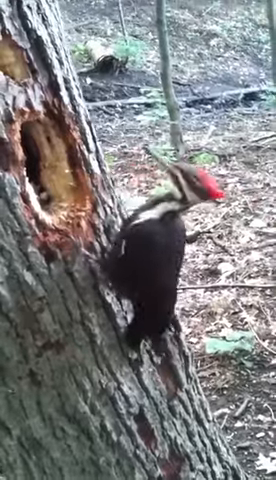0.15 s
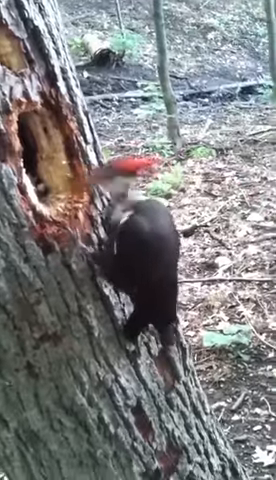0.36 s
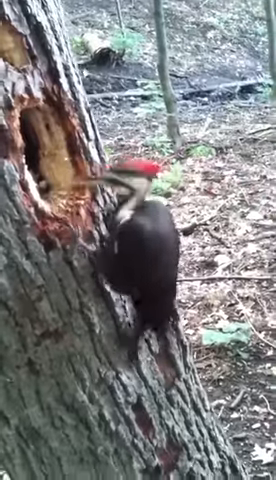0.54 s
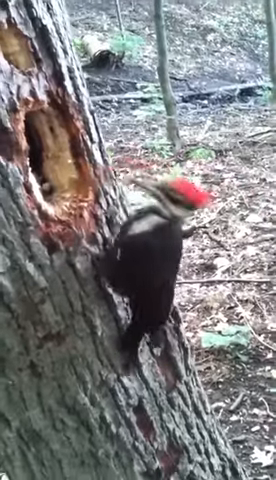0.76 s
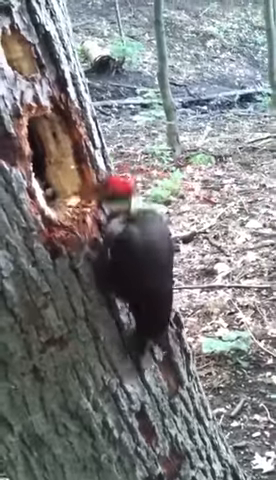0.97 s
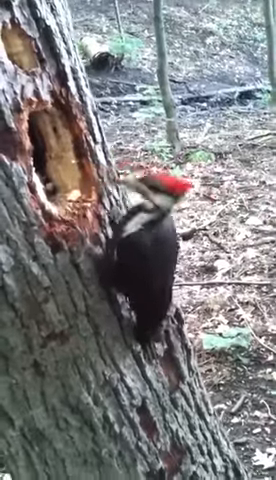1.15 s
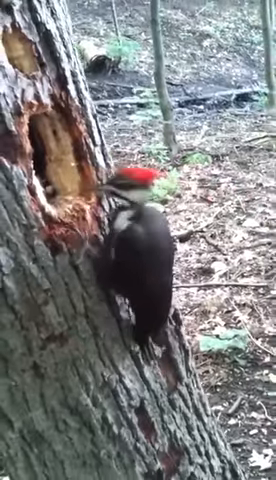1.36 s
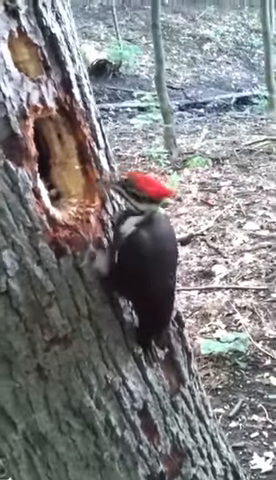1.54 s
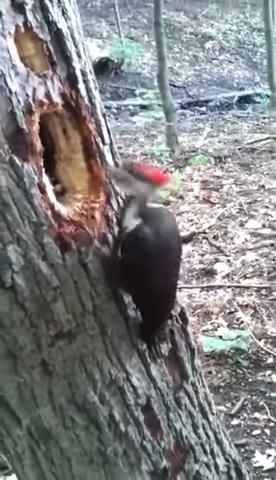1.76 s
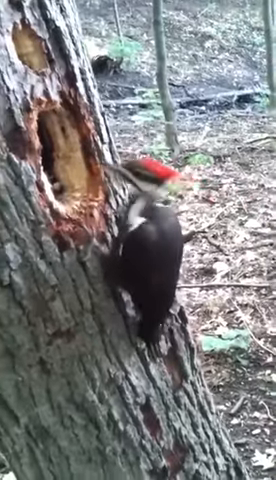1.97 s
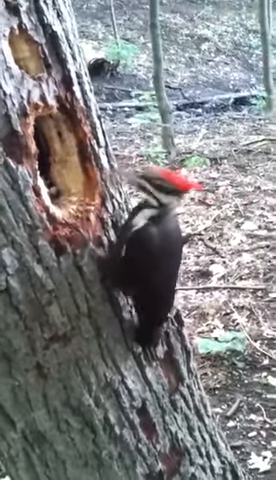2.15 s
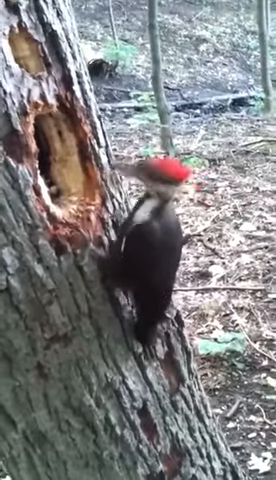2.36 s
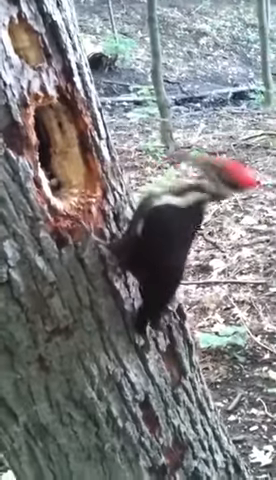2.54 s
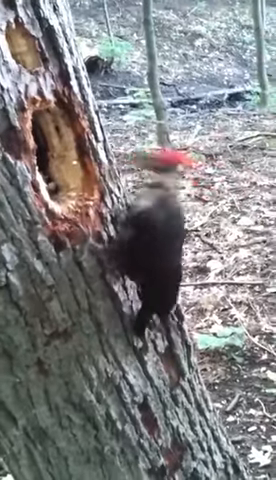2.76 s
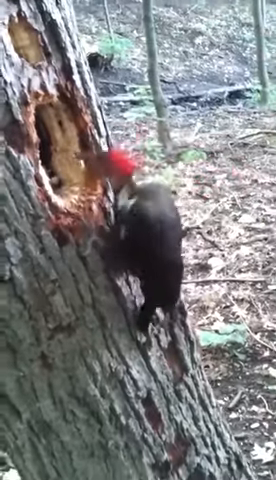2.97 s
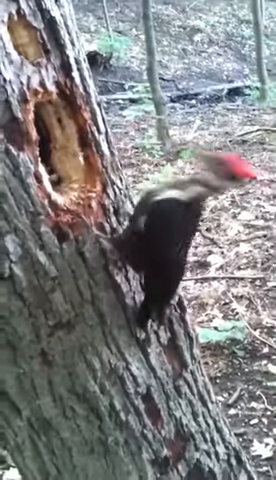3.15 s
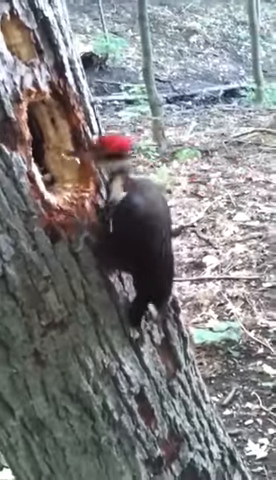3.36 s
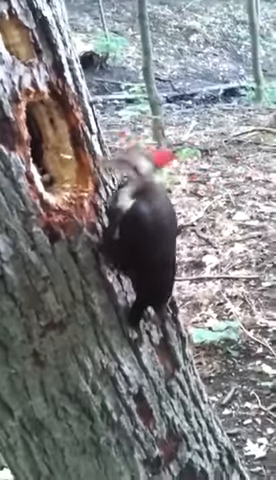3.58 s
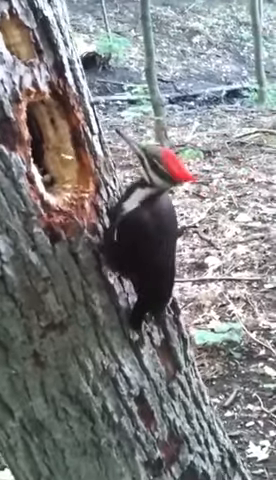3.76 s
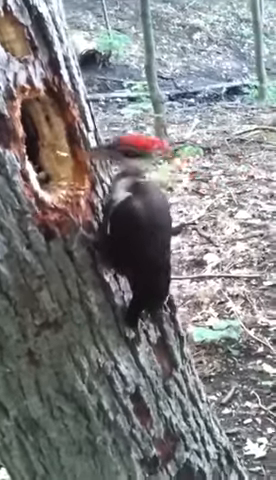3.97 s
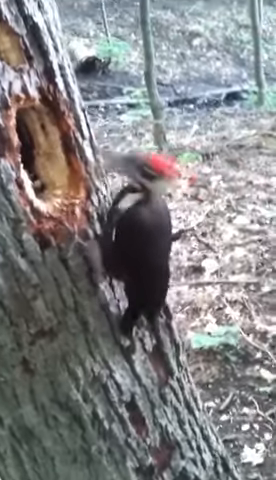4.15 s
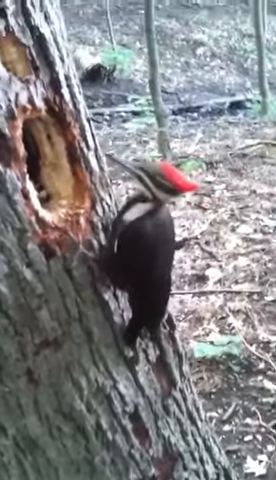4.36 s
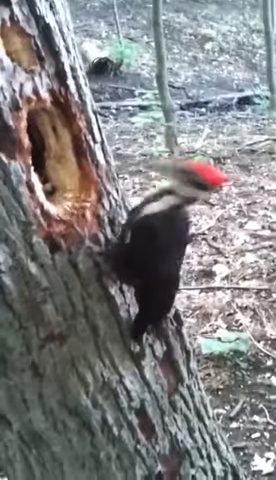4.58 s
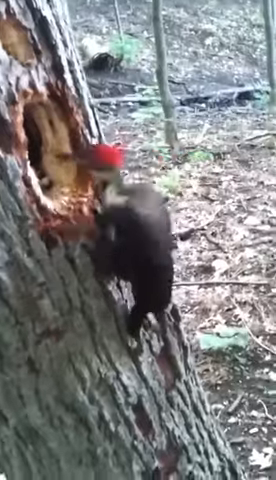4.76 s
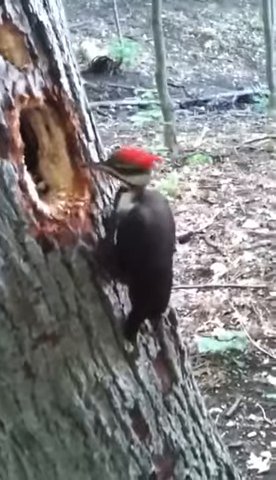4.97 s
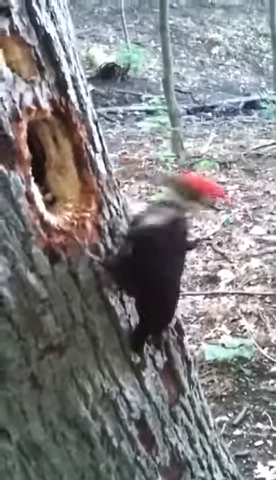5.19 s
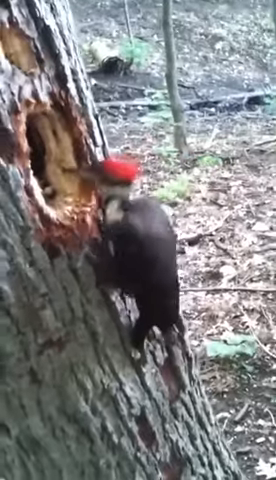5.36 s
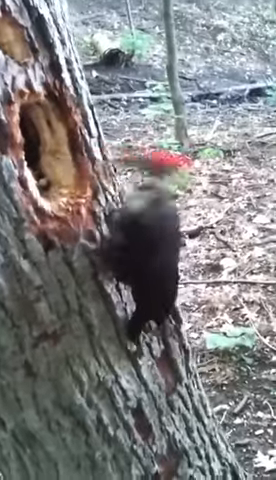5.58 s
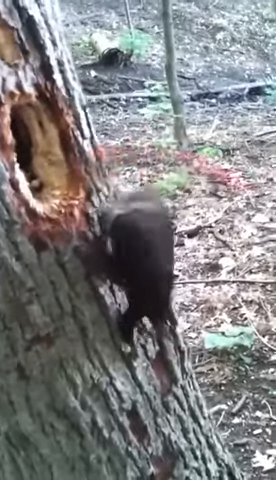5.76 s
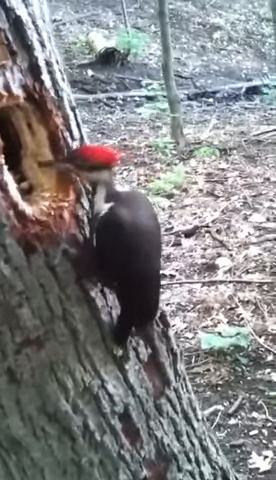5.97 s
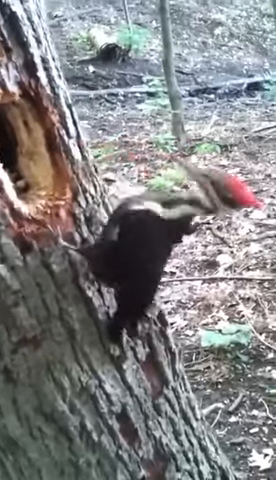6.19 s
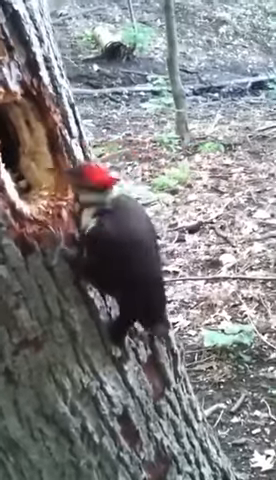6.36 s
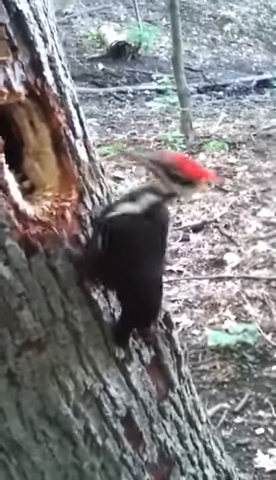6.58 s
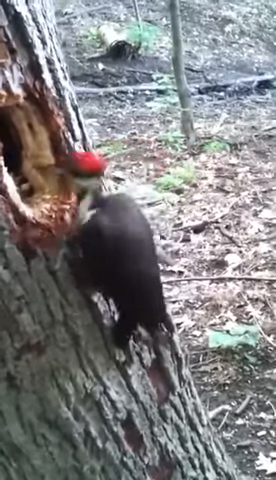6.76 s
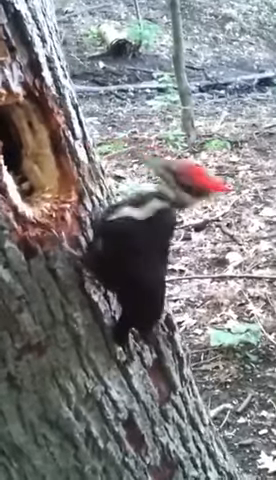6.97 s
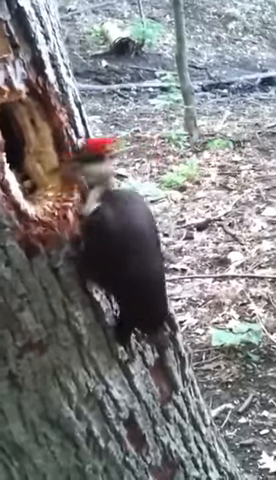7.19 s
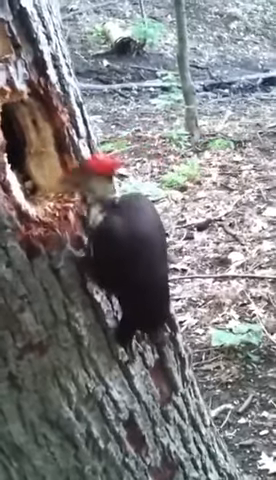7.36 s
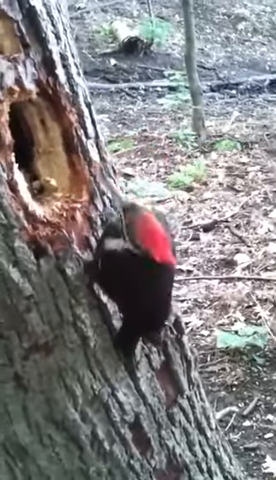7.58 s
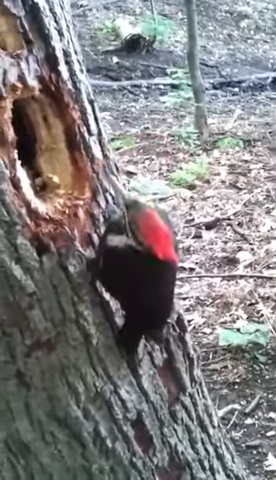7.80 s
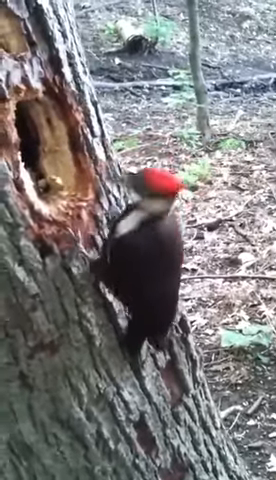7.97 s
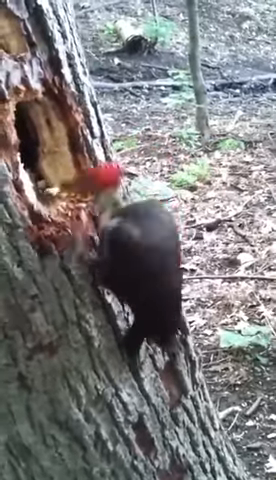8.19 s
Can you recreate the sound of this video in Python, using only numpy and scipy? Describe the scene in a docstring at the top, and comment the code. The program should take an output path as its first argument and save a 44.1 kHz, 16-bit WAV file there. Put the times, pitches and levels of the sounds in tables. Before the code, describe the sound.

Sharp, uneven woodpecker pecks knock and crack the wood of a trunk, over a soft woodland hush and high, far birdsong.

```python
"""In a wood, the microphone stands a few metres from a tree trunk. From the start there is a hush
over a far rumble, and a small bird pips at a steady beat. A large woodpecker scrapes at the bark, then
from 1 s chisels at a hole: each blow knocks the hollowed trunk and cracks its fibres. Far off, smeared
by the echo of the trees, come thin whistles, a see-saw song and, from 4 s, three slurred phrases.
Between about 5 and 7 s the hardest blows fall and the bill prises splinters loose."""
import sys
import numpy as np
from scipy import signal
from scipy.fft import rfft, irfft
from scipy.io import wavfile
from scipy.ndimage import uniform_filter1d

SR = 44100
rng = np.random.default_rng(int(sys.argv[2]) if len(sys.argv) > 2 else 0)


def dump(signal):
    """Clip the signal to [-1, 1] and save it as 16-bit WAV at the path in sys.argv[1]."""
    limited = np.clip(np.atleast_2d(signal).T, -1, 1)
    pcm = np.round(limited * 32767).astype(np.int16)
    wavfile.write(sys.argv[1], SR, pcm)


N = 362943
MIC_TOP_HZ = 7700


def gain_of(db):
    """Decibels to a factor."""
    return 10 ** (np.asarray(db) / 20)


def unit_rms(x):
    """Scales to rms 1."""
    return x / np.sqrt(np.mean(x ** 2) + 1e-20)


def at_hz(curve, hz):
    """Reads a curve on a log-frequency axis."""
    f, value = np.transpose(curve)
    return np.interp(np.log(hz + 1), np.log(f + 1), value)


def at_time(curve, s):
    """Reads a curve at time s."""
    return np.interp(s, *np.transpose(curve))


def add(mix, s, sound):
    """Mixes a sound in at time s."""
    part = mix[max(round(s * SR), 0):][:len(sound)]
    part += sound[:len(part)]


def coloured(x, spectrum, size=2048):
    """Causal filter of unit energy, so that clicks keep their sharp front."""
    log_gain = np.log(gain_of(at_hz(spectrum, abs(np.fft.fftfreq(size, 1 / SR)))))
    minimum_phase = np.exp(np.conj(signal.hilbert(log_gain)))
    taps = np.fft.ifft(minimum_phase).real[:size // 2]
    return signal.oaconvolve(x, taps / np.linalg.norm(taps))[:N]


def band_limit(x):
    """Steep low-pass at the top of the microphone's range."""
    taps = signal.firwin(401, MIC_TOP_HZ, window=("kaiser", 7), fs=SR)
    return np.apply_along_axis(signal.oaconvolve, -1, x, taps, "same")


# spectrum of the wood's hush, all around the microphone: (f/Hz, relative level/dB)
HUSH = [(20, -17.5), (35, -35), (55, -4.5), (92, 2.5), (150, -4.5), (230, -10.5), (400, -11), (600, -14.5),
        (1350, -17), (2100, -23.5), (3500, -29.5), (4700, -26.5), (6300, -28.5), (7600, -38.5)]
# far rumble, swelling about its mean: (t/s, bass level/dB, drone level/dB)
RUMBLE = [(0.0, -46.5, -59.5), (1.3, -48, -57), (1.98, -47.5, -57.5), (3.72, -45.5, -53.5),
          (5.0, -46, -57.5), (6.55, -44, -50.5), (7.76, -48, -56.5), (8.2, -47.5, -48)]
def hush(db=-44, drone_hz=155, swirl_db=4.5):
    """Steady hiss over a far rumble, with a slight random swirl added to the treble."""
    t = np.arange(N // 512 + 5) * 512 / SR
    hz = np.fft.rfftfreq(2048, 1 / SR)[:, None]
    noise = rng.standard_normal((5, len(hz), len(t)))
    swirl = uniform_filter1d(noise[4], size=22, axis=0)
    swirl = unit_rms(uniform_filter1d(swirl, size=4, axis=1))
    s, bass_db, drone_db = np.transpose(RUMBLE)
    swell_db = bass_db - bass_db.mean()
    drone_swell_db = drone_db - drone_db.mean() - swell_db
    level_db = at_hz(HUSH, hz) + np.interp(t, s, swell_db) / (1 + hz / 700)
    level_db += np.interp(t, s, drone_swell_db) * np.exp(-((hz - drone_hz) / 40) ** 2)
    level_db += swirl_db * hz / (hz + 2000) * swirl
    spectra = (noise[:2] + 1j * noise[2:4]) * gain_of(level_db) * (hz < MIC_TOP_HZ)
    mid, side = signal.istft(spectra, nperseg=2048, noverlap=1536)[1][:, :N]
    return gain_of(db) * stereo(unit_rms(mid), unit_rms(side))


def whistle(length_s, first_hz, middle_hz, last_hz, waver=.012):
    """A pure tone that bends through three pitches, quavering by the share waver of its pitch."""
    progress = np.linspace(0, 1, max(int(length_s * SR), 64))
    hz = np.polyval(np.polyfit([0, .5, 1], [first_hz, middle_hz, last_hz], 2), progress)
    hz *= 1 + waver * np.interp(progress, np.linspace(0, 1, 20), rng.standard_normal(20))
    return unit_rms(np.sin(2 * np.pi * np.cumsum(hz) / SR) * signal.windows.tukey(len(hz), .35))


# the nearest small bird, lower and upper partial of its pips: (t/s, level/dB)
PIP_LOWER = [(0, -38.5), (0.5, -86), (2.3, -47), (2.85, -41), (3.4, -65.5), (4.6, -47), (5.7, -54.5),
             (6.1, -47.5), (6.7, -36), (8.2, -41.5)]
PIP_UPPER = [(3.9, -55), (4.25, -46.5), (5.0, -50), (5.5, -61)]
def pipping_bird(every_s=.1884, length_s=.028, start_hz=4406, climb_hz_per_s=44, arch=.045):
    """Short arched pips with two partials, evenly spaced, creeping up in pitch."""
    pips = np.zeros(N)
    for s in np.arange(.067, N / SR, every_s):
        hz = (start_hz + climb_hz_per_s * s) * np.array([1 - arch, 1, 1 - arch])
        for ratio, levels in (1, PIP_LOWER), (1.47, PIP_UPPER):
            add(pips, s - length_s / 2, gain_of(at_time(levels, s)) * whistle(length_s, *(ratio * hz)))
    return pips


# modes of the hollowed trunk: (f/Hz, level/dB, t60/s)
TRUNK_MODES = [(167, -21, 0.12), (733.6, -13.5, 0.081), (809.4, 2.5, 0.019), (894, -9.5, 0.057),
               (1114, -20, 0.09), (1357, -12, 0.051), (1572, -12, 0.012), (2205, -14, 0.027)]
def knock(pitch=1, deep_db=-8, swell_s=.00039, contact_s=.0068, ring_db=-7, deep_hz=419.6):
    """The trunk swings hard for a few cycles while the bill is in the wood, then rings on faintly."""
    t = np.arange(SR // 6) / SR
    contact = np.exp(-(t / contact_s) ** 4)
    detune = 1 + .022 * rng.standard_normal(len(TRUNK_MODES))
    body = np.zeros(len(t))
    for (hz, db, t60), tuning in zip(TRUNK_MODES, detune):
        envelope = .5 * contact + gain_of(ring_db - 60 * t / t60) * (1 - contact)
        body += gain_of(db) * envelope * np.sin(2 * np.pi * hz * pitch * tuning * t)
    deep_envelope = (1 - np.exp(-t / .002)) * gain_of(-60 * t / .068)
    deep_mode = gain_of(deep_db - 6.5) * deep_envelope * np.sin(2 * np.pi * deep_hz * detune[0] * t)
    return (body + deep_mode) * (1 - np.exp(-(t / swell_s) ** 2))


def fibres(count, clump_db):
    """Snapping fibres: dense clicks that come in clumps of about a millisecond."""
    clumps = unit_rms(uniform_filter1d(rng.standard_normal(count), size=48))
    return unit_rms(band_limit(rng.standard_normal(count)) * gain_of(clump_db * np.clip(clumps, -2, 2)))


def strike(tree, s, knock_db, tick_db, crack_db, crack_s=.0018, tick_s=.0021, lead_s=0, **trunk):
    """The bill's tip ticks and cracks the surface, and the trunk answers."""
    t = np.arange(SR // 4) / SR
    bite = 1 - np.exp(-t / .0014)
    tick = fibres(len(t), clump_db=2) * bite * np.exp(-t / tick_s)
    crack = fibres(len(t), clump_db=6.5) * bite * np.exp(-t / crack_s)
    add(tree["knocks"], s, gain_of(knock_db + 2.5) * knock(**trunk))
    add(tree["ticks"], s - lead_s, gain_of(tick_db) * tick)
    add(tree["cracks"], s - lead_s, gain_of(crack_db) * crack)


def tear(tree, s, db, length_s=.031, delay_s=.004, rise_s=.0041):
    """Fibres go on giving way in clumps behind a crack."""
    t = np.arange(SR // 4) / SR
    envelope = (1 - np.exp(-t / rise_s)) * np.exp(-(t / length_s) ** 2)
    add(tree["cracks"], s + delay_s, gain_of(db) * fibres(len(t), clump_db=4.5) * envelope)


# scrapes on the trunk, a few metres off: (t/s, length/s, knock/dB, tick/dB, scrape/dB)
SCRAPES = [(0.416, 0.022, -52, -39, -40), (0.52, 0.069, -60, -55, -51), (1.3, 0.019, -32.5, -50, -41.5),
           (3.052, 0.032, -60, -50, -46.5), (4.63, 0.0071, -45, -27, -38), (5.88, 0.22, -45, -48, -48),
           (7.492, 0.038, -40, -36.5, -39.5), (8.213, 0.023, -36, -45, -37.5)]
def scrapes(tree):
    """Bill and claws catch on the bark, and it crumbles."""
    for s, length_s, knock_db, tick_db, scrape_db in SCRAPES:
        strike(tree, s, knock_db, tick_db, scrape_db)
        tear(tree, s, scrape_db, length_s, delay_s=0)


# full blows at the hole: (t/s, knock/dB, trunk pitch factor, deep mode trim/dB, knock swell/s,
# tick/dB, crack/dB, crack decay/s, tearing/dB, lead of the crack over the knock/s)
BLOWS = [(0.9831, -20.5, 0.99, -9.5, 0.00069, -26, -26.5, 0.0066, -49.5, 0.0073),
         (2.6810, -18.5, 1.015, 1.5, .0008, -16, -35, 0.0039, -42, 0.0055),
         (2.9893, -15, 1, -6, 0.00085, -21, -27.5, 0.0034, -40.5, 0.0037),
         (3.3323, -12, 0.96, -5.5, 0.0015, -23, -28.5, .005, -40.5, 0.0033),
         (4.7932, -11, 0.98, -5, 0.00086, -24.5, -16.5, 0.0031, -28.5, 0.0018),
         (5.4035, -8.5, .98, -7.5, 0.00096, -31, -28.5, 0.0036, -36, 0.0016),
         (5.8297, -9.5, 1.04, -7.5, 0.00084, -18, -8, 0.0019, -29, 0.0073),
         (6.3106, -14, 0.98, -6, 0.0008, -12.5, -15, 0.0049, -33, 0.003),
         (6.7355, -16, 0.97, -8.5, 0.0017, -45, -20, 0.0037, -32.5, 0.0011),
         (7.1030, -13.5, 0.989, -13, 0.0024, -20.5, -12.5, 0.0034, -40.5, 0.00024)]
def blows(tree):
    """The bill drives into the trunk and tears its fibres."""
    for s, knock_db, pitch, deep_db, swell_s, tick_db, crack_db, crack_s, tear_db, lead_s in BLOWS:
        strike(tree, s, knock_db, tick_db, crack_db, crack_s,
               lead_s=lead_s, pitch=pitch, deep_db=deep_db, swell_s=swell_s)
        tear(tree, s, tear_db)


def glide(length_s, first_hz, last_hz, bend, waver=.012):
    """A whistle that has gone the share bend of its way by half time."""
    return whistle(length_s, first_hz, first_hz + bend * (last_hz - first_hz), last_hz, waver)


# thin whistles far from the microphone: (t/s, length/s, f/Hz, level/dB)
THIN_WHISTLES = [(1.08, 0.073, 5170, -60), (1.14, .027, 5870, -59), (1.95, .13, 6220, -59.5),
                 (3.42, 0.055, 5520, -54), (3.605, 0.094, 5670, -55), (3.835, 0.015, 5640, -50.5)]
def thin_whistles(sag=.026, direct_db=7.5):
    """Nearly level notes whose pitch sags at the end."""
    for s, length_s, hz, db in THIN_WHISTLES:
        yield s, glide(length_s, hz, hz * (1 - sag), bend=0), db, direct_db


# far see-saw song: (t/s, sweep top/Hz, sweep/dB, lead-in first/Hz, lead-in last/Hz, lead-in/dB)
SEESAW = [(1.247, 6320, -45.5, 5050, 5150, -67.5), (1.447, 6740, -44, 5260, 4880, -46.5),
          (1.640, 6620, -41, 5330, 4070, -46), (1.840, 6220, -42, 4770, 5160, -42.5)]
# its closing flicks: (t/s, level/dB)
FLICKS = [(1.901, -50.5), (2.086, -44.5)]
def seesaw_song(lead_s=.066, direct_db=0):
    """Each syllable is a low lead-in and an upward sweep; steep downward flicks close the song."""
    for s, top_hz, db, lead_first_hz, lead_last_hz, lead_db in SEESAW:
        yield s - lead_s, glide(lead_s, lead_first_hz, lead_last_hz, bend=.34), lead_db, direct_db
        yield s, glide(.06, first_hz=4550, last_hz=top_hz, bend=.7), db, direct_db
    for s, db in FLICKS:
        yield s, glide(.064, first_hz=6730, last_hz=4330, bend=.38), db, direct_db


# light taps on the trunk: (t/s, knock/dB, crack/dB)
TAPS = [(1.8150, -41, -37), (2.0440, -44, -34), (3.5865, -63, -29), (4.0470, -37.5, -39.5),
        (4.061, -55, -37), (5.328, -49, -39), (7.3540, -39.5, -35), (7.797, -45, -42.5)]
def taps(tree):
    """The bill probes the wood without tearing it."""
    for s, knock_db, crack_db in TAPS:
        strike(tree, s, knock_db, tick_db=crack_db - 11.5, crack_db=crack_db)


# far slurring bird, falling notes: (t/s, first/Hz, last/Hz, level/dB)
FALLS = [(4.073, 4210, 3660, -49), (4.134, 5410, 4520, -38.5), (4.204, 3565, 2710, -42),
         (4.247, 3690, 2530, -37.5), (6.857, 3530, 2660, -37.5), (6.945, 3393, 2297, -37.5),
         (7.741, 4150, 3700, -52.5), (7.827, 5070, 3710, -44), (7.911, 4410, 2600, -41.5),
         (8.015, 3230, 2740, -50)]
# its rising notes: (t/s, last/Hz, level/dB)
RISES = [(4.098, 4930, -38), (6.587, 5620, -40), (6.767, 6000, -36)]
# its direct path to the microphone: (t/s, trim/dB)
SLUR_DIRECT = [(4.2, 6), (6.8, -3.5), (7.9, 0.5)]
def slurring_bird(fall_s=.05, rise_s=.037, foot_hz=3600, bend=.42, waver=.0238):
    """Three phrases of quavering slurs that step downward."""
    for s, first_hz, last_hz, db in FALLS:
        yield s, glide(fall_s, first_hz, last_hz, bend, waver), db, at_time(SLUR_DIRECT, s)
    for s, last_hz, db in RISES:
        yield s, glide(rise_s, foot_hz, last_hz, bend, waver), db, at_time(SLUR_DIRECT, s)


# splinters at the hole: (t/s, knock/dB, crack/dB)
SPLINTERS = [(4.853, -36.5, -25), (5.4402, -28, -12.5), (5.4899, -27, -24), (5.522, -46.5, -27.5),
             (5.8737, -33, -12), (5.908, -30, -15), (5.9450, -33, -16.5), (5.9829, -33.5, -34),
             (6.7495, -51, -20), (6.7635, -56, -22)]
def splinters(tree):
    """Splinters snap as the bill prises after a blow."""
    for s, knock_db, crack_db in SPLINTERS:
        strike(tree, s, knock_db, tick_db=crack_db - 8.5, crack_db=crack_db, crack_s=.0026)
        tear(tree, s, crack_db - 25.5)


# echo among the trees: (f/Hz, t60/s before scaling)
FOREST_T60 = [(200, 1), (800, 0.67), (2500, 1), (5000, 0.68), (8000, 0.92)]
def forest(x, build_s, t60_scale, echoes_per_s=2500):
    """Many faint echoes from trunks and ground, building up and dying band by band."""
    echoes = rng.standard_normal(SR) * (rng.random(SR) < echoes_per_s / SR)
    hz, t, bands = signal.stft(echoes, SR, nperseg=256)
    t60 = t60_scale * at_hz(FOREST_T60, hz)[:, None]
    bands *= gain_of(-60 * t / t60) * (1 - np.exp(-t / build_s))
    tail = signal.istft(bands, SR, nperseg=256)[1]
    return signal.fftconvolve(x, tail / np.linalg.norm(tail))[:N]


# stereo width: (f/Hz, side gain/dB)
WIDTH = [(60, -59), (500, -68), (1500, -55.5), (3300, -71), (4400, -13.5), (5500, -3), (7500, -12)]
def stereo(mid, side):
    """Stereo width: centred below about 4 kHz, wide in the treble."""
    side = irfft(rfft(side) * gain_of(at_hz(WIDTH, np.fft.rfftfreq(N, 1 / SR))), N)
    return np.array([mid + side, mid - side])


# colour of cracking wood: (f/Hz, level/dB)
CRACK_COLOUR = [(60, 4.5), (160, 11), (280, -9), (550, -6), (850, 2.5), (1200, 0.5), (1800, -2.5),
                (2500, 1.5), (3300, 0.5), (4200, 5), (5000, 5.5), (5700, 7.5), (6600, 0.5), (7800, 0)]
# resonances of the bill's tip against hard wood: (f/Hz, width/Hz, level/dB)
BILL_MODES = [(2087, 250, 14), (2623, 180, 11.5), (4560, 110, -11), (5440, 900, 10.5), (6670, 1200, -23.5)]
def woodpecker():
    """The bird's work from a few metres, scattered by the trunk's hollow and the trees around."""
    tree = {layer: np.zeros(N) for layer in ("knocks", "ticks", "cracks")}
    for action in scrapes, blows, taps, splinters:
        action(tree)
    hz = np.geomspace(100, SR / 2, num=300)
    tick_power = sum(gain_of(db) ** 2 / (1 + ((hz - f) / width) ** 2) ** 2
                     for f, width, db in BILL_MODES)
    tick_colour = np.transpose([hz, 10 * np.log10(tick_power)])
    knocks = tree["knocks"]
    snaps = coloured(tree["cracks"], CRACK_COLOUR) + coloured(tree["ticks"], tick_colour)
    direct = knocks + snaps
    near = forest(gain_of(-7) * knocks + gain_of(-6) * snaps, build_s=.0011, t60_scale=.12)
    far = forest(gain_of(-22.5) * knocks + gain_of(-9) * snaps, build_s=.0045, t60_scale=.62)
    side = gain_of(-1.5) * forest(direct, build_s=.001, t60_scale=.1)
    return stereo(direct + near + far, side)


def songbirds(pip_direct_db=-8.5, pip_echo_db=-11):
    """Far songs reach the microphone mostly as echo; the pipping bird is nearer and drier."""
    pips = pipping_bird()
    scattered = gain_of(pip_echo_db) * pips
    direct = np.zeros(N)
    for s, note, db, direct_db in (*thin_whistles(), *seesaw_song(), *slurring_bird()):
        add(scattered, s, gain_of(db) * note)
        add(direct, s, gain_of(db + direct_db) * note)
    # ground and nearby twigs blur even the first arrival by a few milliseconds
    first = .6 * direct + .6 * forest(direct, build_s=.002, t60_scale=.2)
    echo = forest(scattered, build_s=.016, t60_scale=.8)
    late = gain_of(-5) * forest(scattered, build_s=.12, t60_scale=.84)
    side = gain_of(-3.5) * forest(scattered, build_s=.01, t60_scale=1.3)
    return stereo(first + gain_of(pip_direct_db) * pips + echo + late, side)


def scene():
    """The woodpecker in front, songbirds and hush behind."""
    return hush() + songbirds() + woodpecker()


def record(dry):
    """The microphone's bass roll-off and band limit."""
    bass_cut = signal.butter(2, 36, "highpass", fs=SR, output="sos")
    return band_limit(signal.sosfilt(bass_cut, dry))


dry = scene()
out = record(dry)
dump(out)
```